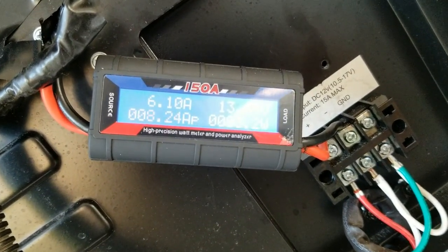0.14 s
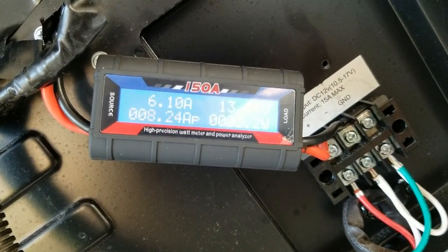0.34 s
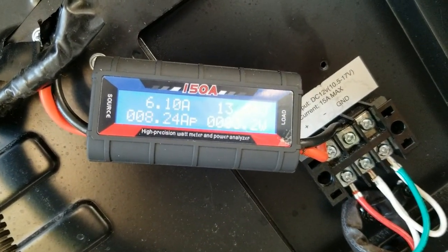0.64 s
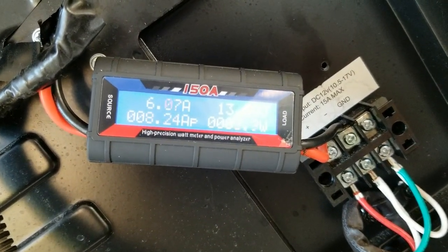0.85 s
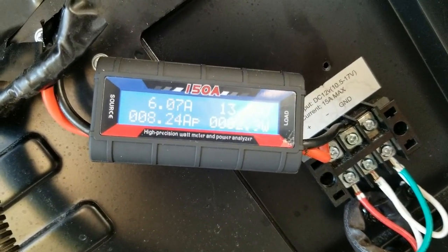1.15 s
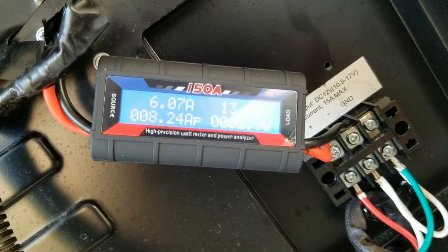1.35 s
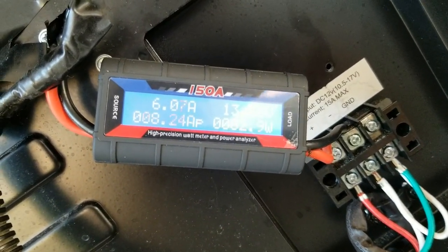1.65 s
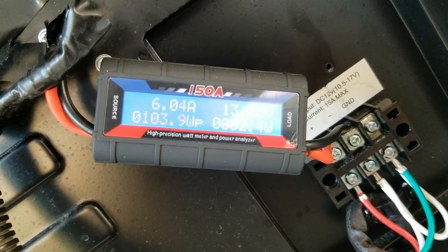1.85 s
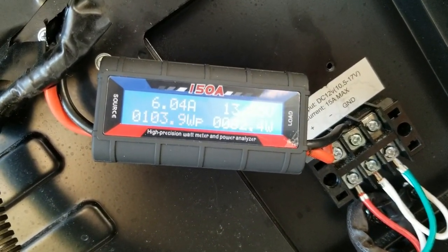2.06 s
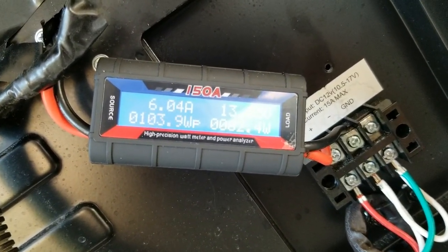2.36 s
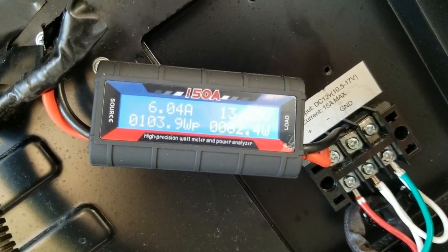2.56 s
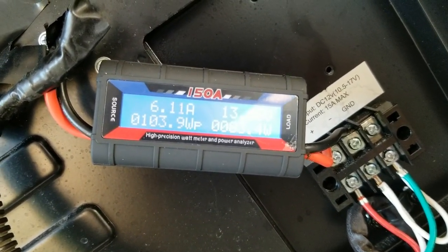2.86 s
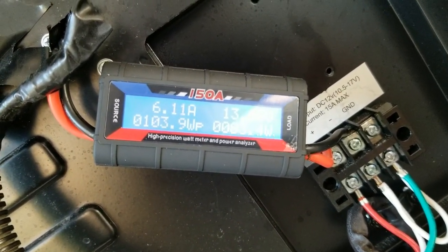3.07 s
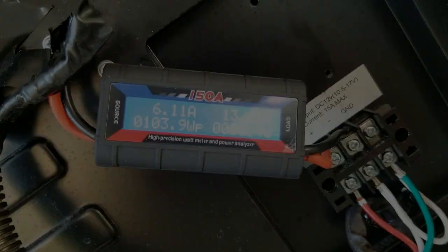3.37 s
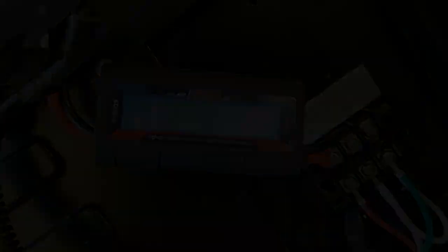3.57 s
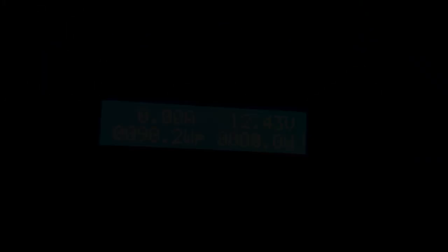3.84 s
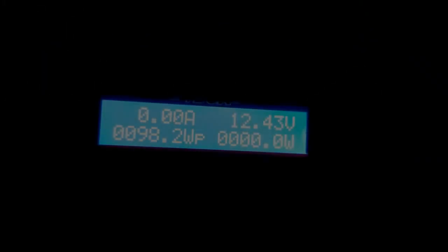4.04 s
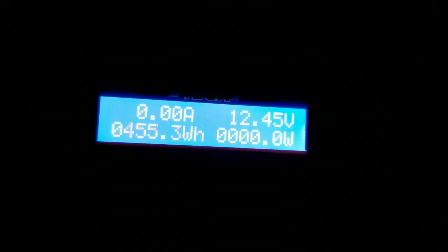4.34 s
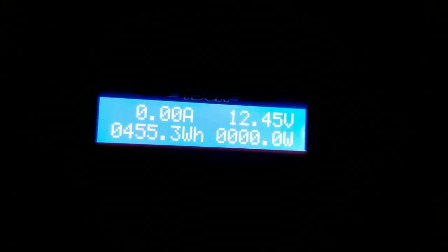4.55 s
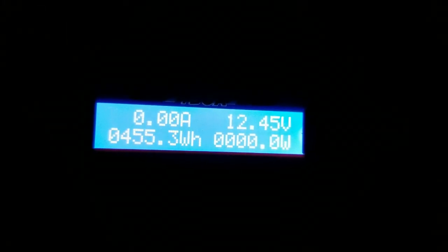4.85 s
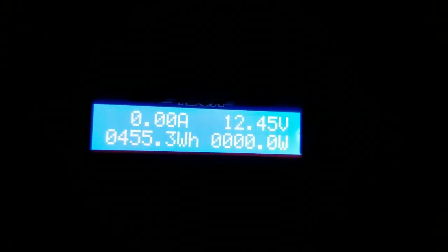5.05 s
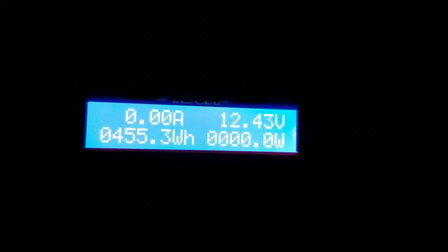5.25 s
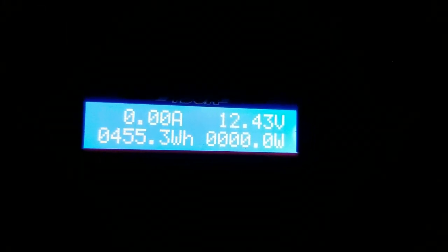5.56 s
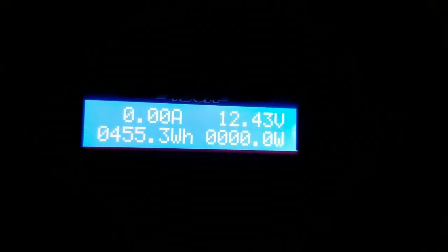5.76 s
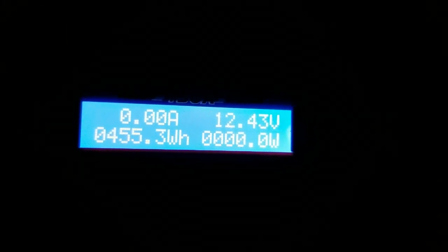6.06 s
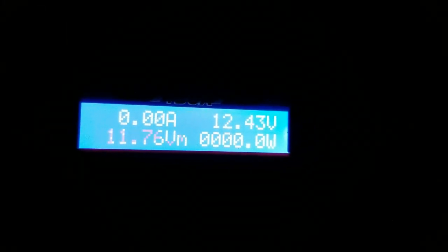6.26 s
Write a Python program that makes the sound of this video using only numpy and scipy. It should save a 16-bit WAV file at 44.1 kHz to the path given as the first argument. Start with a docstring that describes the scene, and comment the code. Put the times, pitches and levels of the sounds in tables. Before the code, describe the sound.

Steady fridge-like motor hum with four quick bird calls fades into a high, dense cricket trill over low outdoor rumble and a rising distant engine.

```python
"""A small compressor and its fan: tones that waver by chance in a roar coloured by casing resonances.
By day a bird adds four phrases, each a trill, a low note and a trill, from syllables falling in pitch.
A crossfade leads to night: cricket choruses of short rings, shaped-noise air and hiss, faint far tones.
An engine note of wavering harmonics swells at the end; puffs of high noise rustle throughout."""
import sys
import numpy as np
from scipy import signal
from scipy.fft import rfft, irfft
from scipy.io import wavfile
from scipy.ndimage import uniform_filter1d

SR = 44100
rng = np.random.default_rng(int(sys.argv[2]) if len(sys.argv) > 2 else 0)


def persist_wave(psi):
    """Save psi, clipped to +-1, as 16-bit WAV."""
    counts = np.round(np.clip(psi, -1, 1) * 32767).astype(np.int16)
    wavfile.write(sys.argv[1], SR, np.atleast_2d(counts).T)


N = 282681

# Crossfade of day into night. Each row: time in seconds, gain (0-1).
DAY_FADE = [(0, 1), (3.38, 1), (4.17, .1), (4.185, 0)]
NIGHT_FADE = [(3.795, 0), (3.805, 0.085), (4.35, 1)]

# Steady compressor hums. Each row: frequency in Hz, level in dB, left-right in dB,
# left lead in radians, waver in dB.
HUMS = [(120, -42, 3, 0, 1.2), (168.6, -42.5, 0, -.1, 1.2), (1019.6, -51, -1, .5, 1.1),
        (232, -54, 1, -.1, 3), (594.7, -59, 2, -.9, 2.5), (1189.2, -65, -2, -1, 1.5),
        (1683.2, -68, -15, .1, 1.5)]
# Shaft hum, one row: as HUMS, then fastest waver in Hz.
SHAFT_HUM = (60, -39.5, 0.5, -0.66, 1.5, 17.5)
# Low hum, uneven in level, one row: frequency in Hz, left-right in dB, left lead in radians.
LOW_HUM = (99.7, 1.3, 0.018)
# Its louder moments. Each row: centre in seconds, length in seconds, level in dB.
LOW_HUM_PEAKS = [(0.0, 0.25, -41), (.43, 0.35, -42), (.97, .16, -39), (1.3, 0.47, -41.5),
                 (2.1, 0.28, -43.5), (2.66, 0.41, -37), (3.05, 0.24, -42), (3.45, .35, -43)]
LOW_HUM_REST_DB = -51
# Pump tone, one row: frequency in Hz, left-right in dB, left lead in radians.
PUMP_TONE = (295.9, 0.4, -0.12)
# Its level. Each row: time in seconds, level in dB.
PUMP_LEVEL = [(0, -46.5), (.2, -41), (.5, -44.5), (.67, -39.5), (.8, -49.5), (1.0, -43), (1.4, -42.5),
              (1.73, -37), (2.0, -42.5), (2.39, -39.5), (2.72, -44), (2.9, -39.5), (3.5, -43)]

# Fan and casing roar spectrum. Each row: frequency in Hz, relative density in dB.
ROAR_SPECTRUM = [(20, -42), (40, -16), (64, 3), (150, -4), (330, -8.5), (520, -11.5), (900, -19),
                 (1400, -23), (2800, -27.5), (4200, -29), (6000, -38.5), (8200, -48.5), (12300, -44.5),
                 (15700, -49)]
ROAR_DB = -37
# Casing resonances. Each row: centre in Hz, width in Hz, boost in dB.
CASING = [(226.6, 29, 7.1), (402, 24, 2.2), (730, 16, 0.69), (834, 91, 4.7), (1154, 180, 7.2),
          (1560, 62, 2.4), (1790, 108, 8.6), (2107, 79, 4.9), (2340, 160, 4.2)]
# Roar left-right likeness. Each row: frequency in Hz, correlation (-1 to 1).
ROAR_LIKENESS = [(60, 1), (130, 0.82), (290, 1), (640, 0.46), (1410, 0.24), (3100, 0.037), (6820, 0.15),
                 (15000, -0.0)]
# Roar balance. Each row: frequency in Hz, left-right in dB.
ROAR_BALANCE = [(60, 3.5), (110, 4), (200, 0), (380, 3.5), (700, 0), (1290, -2.5), (2380, -5), (4400, -4),
                (8120, 7), (15000, 10)]

# Bird trills and low notes. Each row: first syllable in seconds, first to last syllable in seconds,
# first pitch in Hz, last pitch in Hz, mean drop in a syllable in Hz, first level in dB, last level in dB.
NOTES = [(0.577, .052, 3540, 3150, 200, -55, -58), (.66, 0, 2530, 2550, 150, -61, -59),
         (0.747, .054, 3540, 3100, 320, -50, -50), (1.338, .052, 3310, 3180, 220, -55, -52),
         (1.448, 0, 2340, 2350, 300, -55, -54), (1.535, .046, 3080, 3090, 350, -46, -56),
         (2.256, .032, 3120, 3050, 250, -49, -43), (2.353, .014, 2380, 2350, 150, -51, -52),
         (2.44, .06, 3130, 3080, 560, -46, -49.5), (3.169, .035, 3080, 3030, 350, -49, -49),
         (3.258, .012, 2500, 2330, 200, -53, -54), (3.351, .051, 3250, 3030, 200, -53, -47)]
SYLLABLE_S, SYLLABLE_GAP_S = 0.017, 0.0165
DROP_SPREAD, ENDS_DB, UNEVEN_DB = 0.26, -2, 1.3  # drop spread as a share of the drop

# Cricket groups. Each row: centre in Hz, spread either way in Hz, stroke in seconds,
# fastest throb in Hz, throb in dB, level in dB.
CRICKETS = [(6792, 600, 0.014, 26, 1.25, -49), (6480, 176, 0.018, 12, 4, -63.5)]
STROKE_RATE_HZ = 49.46
OVERTONE_DB = [-25.5, -36]  # octave level in dB: left, right

# Engine harmonics. Each row: multiple of the firing rate, relative level in dB.
ENGINE = [(3, -52), (4, -51.5), (5, -55.5), (6, -63), (7, -54), (8, -59.5), (11, -71.5)]
ENGINE_FIRING_HZ = 57.4
# Engine swell. Each row: time in seconds, gain in dB.
ENGINE_SWELL = [(4.3, -16.5), (5.75, -14.5), (5.92, -6), (6.15, -4), (6.41, 0.5)]

# Low night hums. Each row: frequency in Hz, left-right in dB, left lead in radians, waver in dB.
DRONES = [(58.7, 2, 0.034, 3.0), (99.7, 4, -0.31, 3.5)]
# Their levels. Each row: time in seconds, first hum in dB, second hum in dB.
DRONE_LEVEL = [(4.3, -51, -50.5), (4.8, -49, -47), (5.2, -43.5, -50.5), (5.6, -48, -46.5),
               (6.0, -50, -49.5), (6.41, -60, -42)]
# Passing low note. Each row: time in seconds, frequency in Hz, level in dB.
MOAN = [(4.6, 257.8, -79), (4.8, 254, -55.5), (5.05, 255, -60), (5.25, 259, -61.5), (5.45, 253, -80)]
# Distant motor. Each row: multiple of the shaft rate, level in dB, left-right in dB, left lead in radians.
MOTOR = [(18, -81, 0, 0), (19, -82, 0, 0), (21, -81, -2, 0), (23, -81, 8, 1.9), (24, -76, -1, 2.9),
         (28, -80, 12, -2.4), (29, -81, 1, 2.8), (51, -88, -7, .5), (52, -88, -9, -1.9), (53, -87, 2, -1),
         (55, -89, 1, -.6), (56, -82, -7, 3), (57, -84, -12, -2.5)]
MOTOR_SHAFT_HZ = 58.72

# High ticks and rustles. Each row: start in seconds, 60 dB decay in seconds, centre in Hz, width in Hz,
# level in dB.
RUSTLES = [(.636, .04, 12800, 3000, -54), (2.051, 0.044, 12500, 4000, -57), (2.97, .2, 11500, 4000, -65),
           (3.117, .04, 11500, 6000, -56.5), (4.395, .23, 11100, 2500, -65), (4.915, .25, 11100, 2500, -73),
           (5.045, 0.28, 12400, 3000, -63.5), (5.16, .25, 11500, 3500, -75), (5.39, .3, 9660, 6000, -71),
           (6.22, 0.26, 11000, 3000, -74), (6.311, .3, 11500, 3500, -73)]
RISE_SHARE, RUSTLE_PAN_DB = 0.12, 7  # rise as a share of the decay time

# Night air spectrum. Each row: frequency in Hz, relative density in dB.
AIR_SPECTRUM = [(12, -45), (20, -26), (64, -6.5), (106, -4), (193, -14.5), (270, -19.5), (565, -26.5),
                (771, -33), (1080, -31), (2370, -44.5), (3230, -42.5), (4960, -50), (6000, -47.5),
                (7800, -62), (13200, -120)]
AIR_DB, QUIET_ABOVE_HZ, QUIET_DB = -43.5, 7600, -89  # QUIET_DB is a relative density
# Air swell. Each row: time in seconds, gain in dB.
AIR_SWELL = [(4.3, -2), (4.8, -1.7), (5.3, -1.8), (5.8, -0.3), (6.41, -1)]
# Air and hiss left-right likeness. Each row: frequency in Hz, correlation (-1 to 1).
AIR_LIKENESS = [(60, 1), (130, 0.98), (290, 1), (640, 0.25), (1410, -0.17), (3100, 0.016), (6820, 0.017),
                (15000, 0.01)]
# Air and hiss balance. Each row: frequency in Hz, left-right in dB.
AIR_BALANCE = [(60, 2.5), (110, -0.5), (200, 3), (380, 2), (700, -1.5), (1290, 0), (2380, -4), (4400, -6.5),
               (8120, 11.5), (15000, -2)]
# Microphone hiss spectrum. Each row: frequency in Hz, relative density in dB.
HISS_SPECTRUM = [(7000, -57), (9400, -28), (10300, -9), (12000, -0.5), (14000, -2), (15700, -3.5)]
HISS_DB = -70.5

BASS_CUT_HZ, BAND_EDGE_HZ = 32, 15740


def gain_of(db):
    """Amplitude ratio of a dB value."""
    return 10 ** (np.asarray(db) / 20)


def evened(x):
    """Scale to rms 1."""
    return x / np.sqrt(np.mean(x ** 2) + 1e-20)


def read(points, hz):
    """Interpolate a spectrum table on a log-frequency axis."""
    point_hz, value = np.transpose(points)
    return np.interp(np.log(hz + 1), np.log(point_hz + 1), value)


def follow(rows):
    """Interpolate every column of a time curve, sample by sample."""
    point_s, *columns = np.transpose(rows)
    return np.array([np.interp(np.arange(N) / SR, point_s, c) for c in columns])


def drift(top_hz):
    """Slow chance curve of rms 1: 20 sines of random phase, weaker towards top_hz."""
    t = np.arange(0, N + 256, 256) / SR
    slow = np.zeros(len(t))
    for hz in np.geomspace(top_hz / 16, top_hz, 20):
        slow += np.sin(2 * np.pi * (hz * t + rng.random())) / np.sqrt(hz)
    return np.interp(np.arange(N) / SR, t, evened(slow))


def sides(pan_db):
    """Left and right gains; positive leans left."""
    return gain_of([[pan_db / 2], [-pan_db / 2]])


def tone(hz, db, pan_db, lead_rad):
    """Stereo sine with a level and phase offset between the channels."""
    angle = 2 * np.pi * (np.cumsum(hz * np.ones(N)) / SR + rng.random())
    return np.sqrt(2) * gain_of(db) * sides(pan_db) * np.sin([angle + lead_rad, angle])


def bed(shape_db, likeness, balance, patchy_db):
    """Stereo noise of rms 1 from random short-time spectra with soft drifting patches."""
    frames, hz = N // 512 + 5, np.fft.rfftfreq(2048, 1 / SR)
    a, b, c, d, patches = rng.standard_normal((frames, 1025, 5)).T
    patches = uniform_filter1d(patches, 20, 0)  # across frequency
    patches = evened(uniform_filter1d(patches, 8, 1))  # across time
    same = np.clip(read(likeness, hz), -1, 1)[:, None]
    left, other = a + 1j * b, c + 1j * d
    spectra = np.array([left, same * left + np.sqrt(1 - same ** 2) * other])
    spectra *= gain_of(shape_db(hz)[:, None] + patchy_db * patches)
    spectra *= gain_of(np.outer([.5, -.5], read(balance, hz)))[..., None]
    return evened(signal.istft(spectra, nperseg=2048, noverlap=1536)[1][:, :N])


def roar_shape_db(hz):
    """Roar spectrum raised by bell-shaped casing resonances."""
    shape_db = read(ROAR_SPECTRUM, hz)
    for centre_hz, width_hz, boost_db in CASING:
        shape_db += boost_db * np.exp(-2 * ((hz - centre_hz) / width_hz) ** 2)
    return shape_db


def compressor():
    """Motor, pump and fan tones, wavering in pitch and level, in a roar coloured by the casing."""
    out = gain_of(ROAR_DB) * bed(roar_shape_db, ROAR_LIKENESS, ROAR_BALANCE, patchy_db=1.07)
    for hz, db, pan_db, lead_rad, waver_db in HUMS:
        out += tone(hz * (1 + 0.00065 * drift(4.87)), db + waver_db * drift(8), pan_db, lead_rad)
    hz, db, pan_db, lead_rad, waver_db, waver_hz = SHAFT_HUM
    out += tone(hz * (1 + 0.0015 * drift(4.75)), db + waver_db * drift(waver_hz), pan_db, lead_rad)
    t = np.arange(N) / SR
    low_hum_gain = gain_of(LOW_HUM_REST_DB) * np.ones(N)
    for centre_s, length_s, db in LOW_HUM_PEAKS:
        low_hum_gain += gain_of(db) * np.exp(-8 * ((t - centre_s) / length_s) ** 2)
    pump_gain = gain_of(follow(PUMP_LEVEL))
    for (hz, pan_db, lead_rad), gain in [(LOW_HUM, low_hum_gain), (PUMP_TONE, pump_gain)]:
        out += gain * tone(hz * (1 + 0.0013 * drift(4.73)), 0, pan_db, lead_rad)
    return out


def bird():
    """Chirps to the right: each rough syllable drops in pitch and settles; sparse echoes trail."""
    out, u = np.zeros(N), np.linspace(0, 1, round(SYLLABLE_S * SR))
    for start_s, length_s, first_hz, last_hz, drop_hz, first_db, last_db in NOTES:
        chance, noise = rng.standard_normal((6, 3)), rng.standard_normal((6, 1000))
        steps = np.linspace(0, 1, round(length_s / SYLLABLE_GAP_S) + 1)
        for along, (drop, force, turn), grit in zip(steps, chance, noise):
            hz = first_hz + (last_hz - first_hz) * along
            hz = hz + drop_hz * (1 + DROP_SPREAD * drop) * (1 - u) ** 3
            rough = 1 + 0.52 * evened(uniform_filter1d(grit[:len(u)], size=60))
            envelope = np.sin(np.pi * u ** 0.55)
            call = rough * envelope * np.sin(2 * np.pi * (np.cumsum(hz) / SR + turn))
            level_db = first_db + (last_db - first_db) * along
            level_db += ENDS_DB * (2 * along - 1) ** 2 + UNEVEN_DB * force
            at = round((start_s + along * length_s) * SR) - len(u) // 2
            out[at:][:len(u)] += gain_of(level_db) * call
    echoes = np.zeros((2, 6000))
    late = np.arange(150, 6000, 130)
    # 60 dB decay in 0.5 s
    echoes[:, late] = gain_of(-15.5 - 60 * late / SR / .5) * rng.standard_normal((2, len(late)))
    echoes[:, 0] = 1  # direct sound
    return sides(-10.0) * signal.oaconvolve(out[None], echoes, axes=1)[:, :N]


def crickets(count=31):
    """Many singers a side, each with its own pitch and pace; every wing stroke is a short ring."""
    start = round(NIGHT_FADE[0][0] * SR)
    out, spread = np.zeros((2, N)), np.linspace(-1, 1, count)[:, None]
    for centre_hz, spread_hz, stroke_s, throb_hz, throb_db, db in CRICKETS:
        t = np.arange(round(stroke_s * SR)) / SR
        hz = centre_hz + spread_hz * spread
        for side in range(2):
            ring = np.sin(2 * np.pi * hz * t) + gain_of(OVERTONE_DB[side]) * np.sin(4 * np.pi * hz * t)
            jitter, force = rng.standard_normal((2, count, 200))
            pace_hz = STROKE_RATE_HZ * rng.uniform(.85, 1.15, (count, 1))
            gaps = SR / pace_hz * (1 + .08 * jitter)
            at = (np.cumsum(gaps, 1) - gaps[:, :1] * rng.random((count, 1))).astype(int)
            # singers far from the common pitch are fainter
            stroke_gain = gain_of(2.0 * force - 37.0 * abs(spread) ** 1.15)
            strokes = np.zeros((count, at.max() + 1))
            np.put_along_axis(strokes, at, stroke_gain, 1)
            rings = ring * np.hanning(len(t))
            song = signal.oaconvolve(strokes[:, :N - start], rings, axes=1).sum(0)
            throb = gain_of(db + throb_db * drift(throb_hz)[start:])
            out[side, start:] += throb * evened(song[:N - start])
    return sides(1.5) * out


def engine():
    """Harmonics of a wavering firing rate under a common swell."""
    firing_hz = ENGINE_FIRING_HZ * (1 + 0.0031 * drift(4))
    swell_db = follow(ENGINE_SWELL)[0]
    out = np.zeros((2, N))
    for k, db in ENGINE:
        out += tone(k * firing_hz, db + swell_db + 1.4 * drift(9), 2.1, 0.11 * k)
    return out


def drones():
    """Two low hums, slow in level and wavering by chance."""
    out = np.zeros((2, N))
    for (hz, pan_db, lead_rad, waver_db), db in zip(DRONES, follow(DRONE_LEVEL)):
        out += tone(hz * (1 + 0.0021 * drift(4.9)), db + waver_db * drift(18), pan_db, lead_rad)
    return out


def moan():
    """One low sine gliding in pitch as it comes and goes."""
    hz, db = follow(MOAN)
    return tone(hz, db, 1.5, 0.34)


def distant_motor():
    """Steady high multiples of one shaft rate."""
    return sum(tone(k * MOTOR_SHAFT_HZ, *rest) for k, *rest in MOTOR)


def rustles():
    """Puffs of high noise with a quick rise and a short exponential tail."""
    out, t = np.zeros((2, N)), np.arange(8192) / SR
    bin_hz = np.fft.rfftfreq(len(t), 1 / SR)
    for start_s, t60_s, hz, width_hz, db in RUSTLES:
        rise_s = RISE_SHARE * t60_s
        band = np.exp(-2 * ((bin_hz - hz) / width_hz) ** 2)
        noise = evened(irfft(rfft(rng.standard_normal((2, len(t)))) * band))
        rise = np.sin(np.pi / 2 * np.minimum(t / rise_s, 1)) ** 2
        tail = gain_of(db - 60 * np.maximum(t - rise_s, 0) / t60_s)
        part = out[:, round(start_s * SR):][:, :len(t)]
        part += (sides(RUSTLE_PAN_DB) * noise * rise * tail)[:, :part.shape[1]]
    return out


def air_shape_db(hz):
    """Dull noise spectrum, very quiet above a set frequency."""
    return np.where(hz > QUIET_ABOVE_HZ, QUIET_DB, read(AIR_SPECTRUM, hz))


def night_air():
    """Dull outdoor air with a slow swell, plus steady microphone hiss: two shaped noises."""
    air = bed(air_shape_db, AIR_LIKENESS, AIR_BALANCE, patchy_db=1.0)
    hiss = bed(lambda hz: read(HISS_SPECTRUM, hz), AIR_LIKENESS, AIR_BALANCE, patchy_db=1.0)
    return gain_of(AIR_DB + follow(AIR_SWELL)) * air + gain_of(HISS_DB) * hiss


def scene():
    """Day crossfades to night; rustles bypass the fades."""
    day_gain, night_gain = np.clip(follow(DAY_FADE), 0, 1), np.clip(follow(NIGHT_FADE), 0, 1)
    day = compressor() + bird()
    night = crickets() + engine() + drones() + moan() + distant_motor() + night_air()
    return day_gain * day + night_gain * night + rustles()


def record(dry):
    """The microphone loses the deepest bass; a steep low-pass limits the band."""
    bass_cut = signal.butter(2, BASS_CUT_HZ, "high", fs=SR, output="sos")
    thin = signal.sosfilt(bass_cut, dry)
    band_limit = signal.firwin(2047, BAND_EDGE_HZ, window=("kaiser", 10), fs=SR)
    return signal.oaconvolve(thin, band_limit[None], "same")


dry = scene()
out = record(dry)
persist_wave(out)
```